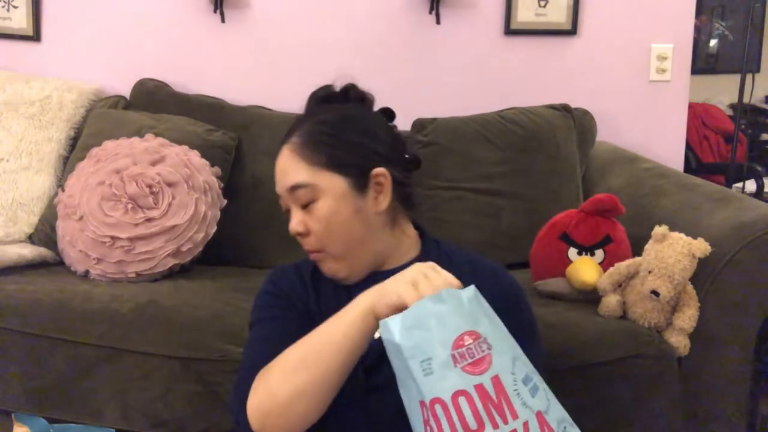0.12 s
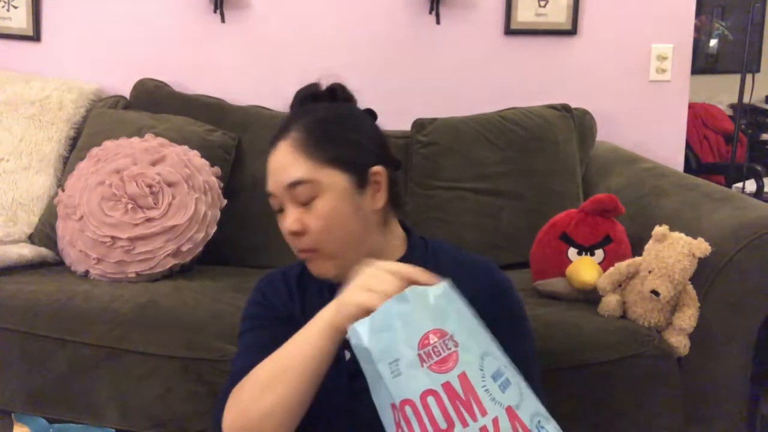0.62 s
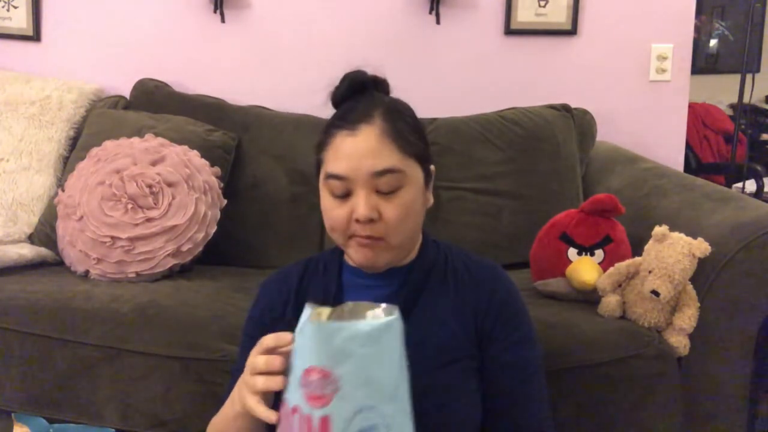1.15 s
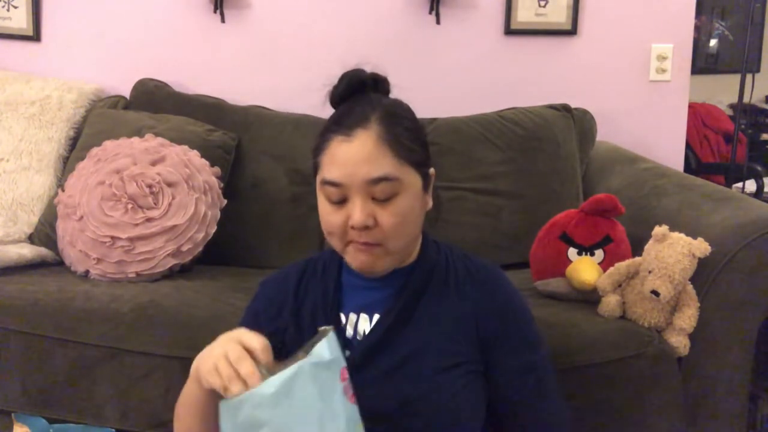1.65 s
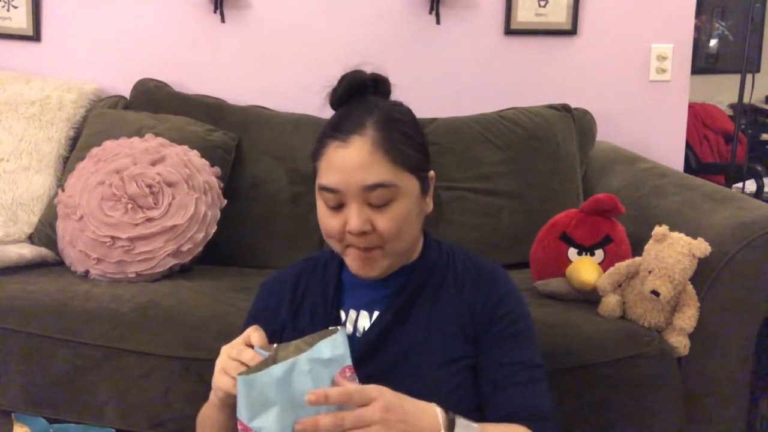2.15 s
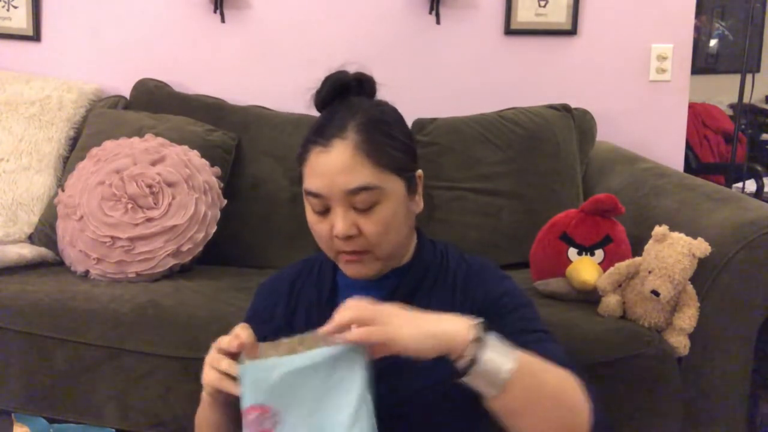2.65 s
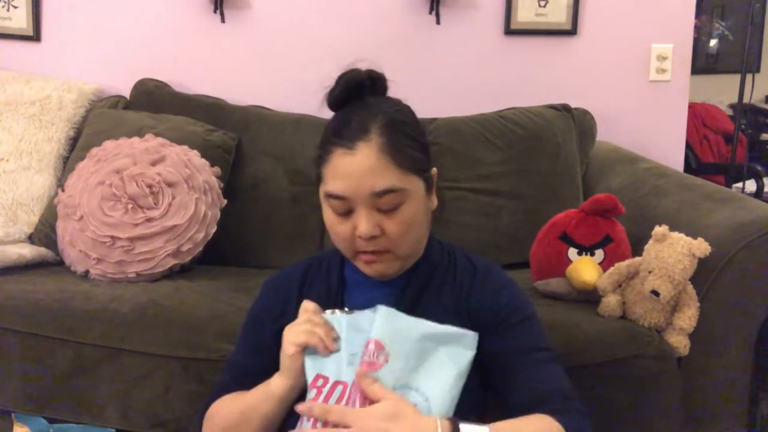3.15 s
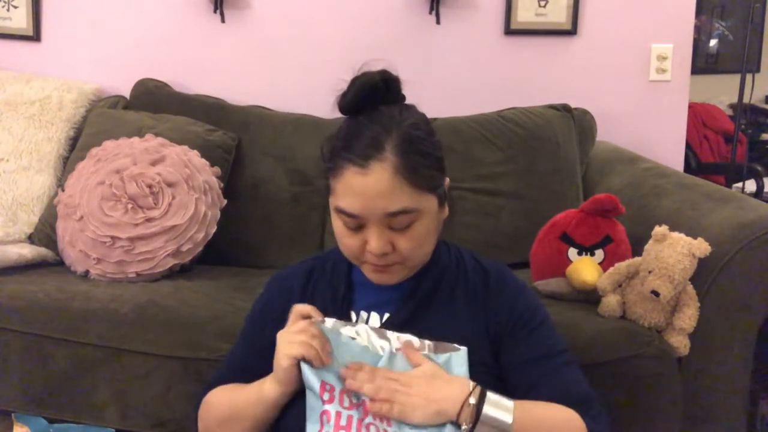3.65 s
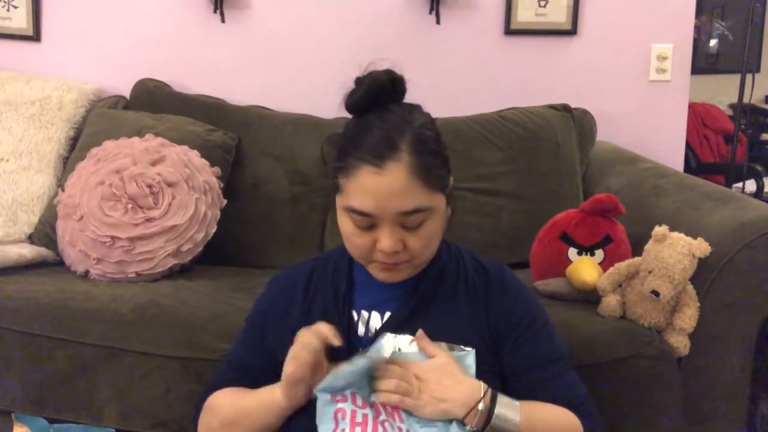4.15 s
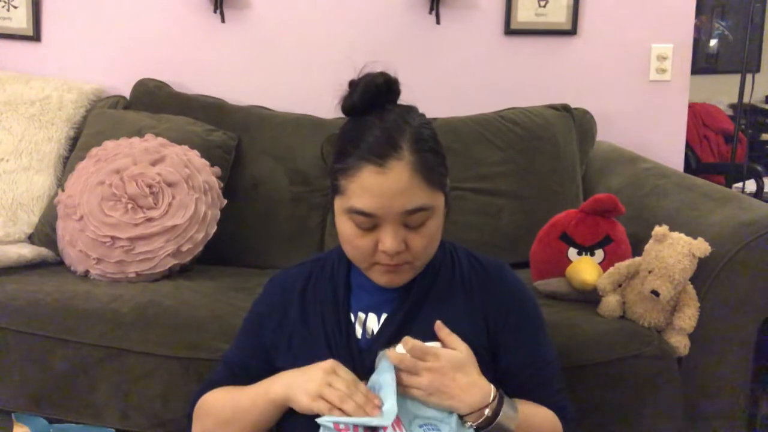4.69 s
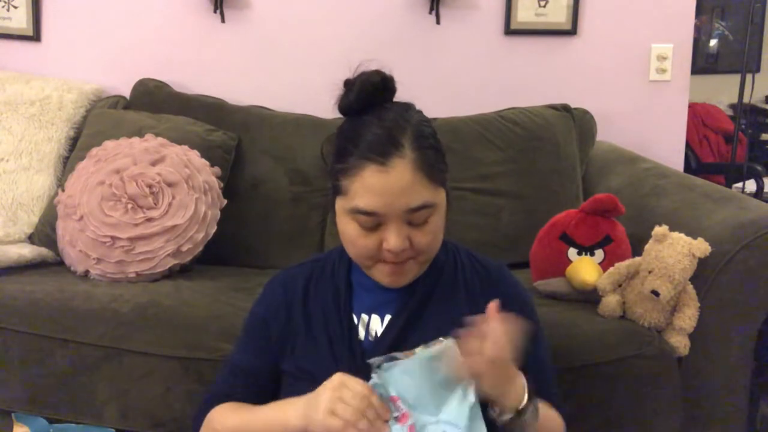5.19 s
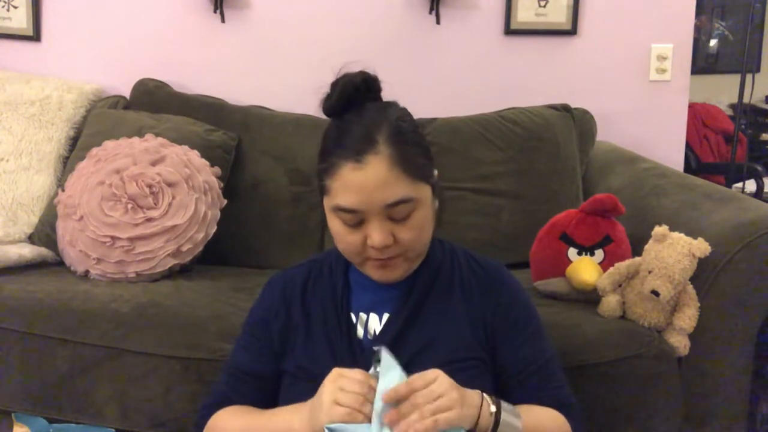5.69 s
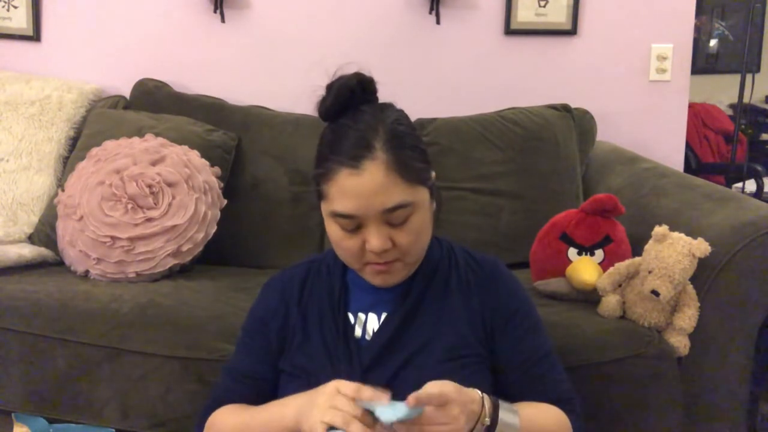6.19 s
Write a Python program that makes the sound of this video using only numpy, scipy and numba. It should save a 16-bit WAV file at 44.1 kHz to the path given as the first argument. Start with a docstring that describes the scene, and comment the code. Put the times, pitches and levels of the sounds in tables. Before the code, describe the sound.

In a soft-furnished living room, a phone microphone about a metre away picks up a foil-lined snack bag. Fingers brush faintly inside, then dull, scattered rustles and ticks follow. From about three seconds the crinkling becomes dense, sharp and bright while the bag is flattened and folded, staying busy to the end over very faint room hum.

```python
"""A foil-lined snack bag is handled and folded in a soft living room, a metre from a phone's microphone.
A faint room hum lies under all. In the first half second fingers brush the lining as they reach in.
Pushes of the hands stir a dense rustle of tiny creases, and sharp snaps of buckling film stand over it:
sparse at first, thick and bright from about 3 s. The air in the bag booms near 2.8 s and again at the end.
Floor, sofa and walls answer briefly throughout; film, lining and air ring as modes or resonant bands."""
import sys
import numpy as np
from scipy import signal
from scipy.fft import rfft, irfft
from scipy.io import wavfile
from numba import njit

SR = 44100
rng = np.random.default_rng(int(sys.argv[2]) if len(sys.argv) > 2 else 0)


def makeup_ratio(level_db):
    """Linear amplitude ratio for a level in decibels (20 dB per factor of ten)."""
    decades = np.asarray(level_db, float) / 20
    return 10 ** decades


def master(y):
    """Save y as 16-bit WAV."""
    cut = np.clip(np.atleast_2d(y).T, -1, 1)
    pcm = np.round(cut * 32767)  # scale
    wavfile.write(sys.argv[1], SR, pcm.astype(np.int16))


N = 278435  # samples, 6.3 s


def unit(x):
    """Scale to rms 1."""
    return x / np.sqrt(np.mean(x ** 2))


# Spectrum of the quiet room at the microphone: f/Hz, relative level/dB
HUM_SPECTRUM = [(24, -30), (40, -6), (118, -3), (220, -8), (1100, -24), (2000, -31), (3700, -29),
                (10700, -31), (16000, -34)]


def hum():
    """Distant air handling rumble and microphone hiss: steady noise shaped over frequency."""
    hum_rms_db = -68
    hz, db = np.transpose(HUM_SPECTRUM)
    f = np.maximum(np.arange(N // 2 + 1) * SR / N, 1)
    spectrum = rfft(rng.standard_normal(N)) * makeup_ratio(np.interp(np.log(f), np.log(hz), db))
    return makeup_ratio(hum_rms_db) * unit(irfft(spectrum, N))


# First reflections, off the floor and then the sofa: delay t/s, level/dB before the dulling
EARLY_ECHOES = [(.0045, -37), (.011, -21.5)]


def room(x, block=4096):
    """Two early echoes and a short dull noise tail, drawn anew per block as the bag moves about."""
    tail_db, tail_t60_s, tail_onset_s = -8.5, 0.2, 0.0078
    t = np.arange(SR // 3) / SR
    shape = makeup_ratio(-60 * t / tail_t60_s) * (1 - np.exp(-(t / tail_onset_s) ** 2))
    shape = shape / np.sqrt(np.sum(shape ** 2))
    reflected = np.zeros(N + block + len(t))
    for i in range(0, N, block):
        answer = makeup_ratio(tail_db) * rng.standard_normal(len(t)) * shape
        for s, db in EARLY_ECHOES:
            answer[int(s * SR)] += makeup_ratio(db)
        wet = signal.fftconvolve(x[i:i + block], answer)
        reflected[i:i + len(wet)] += wet
    soft_walls = signal.butter(1, 6000., fs=SR, output="sos")
    return x + signal.sosfilt(soft_walls, reflected[:N])


# Air left in the bag as it is grabbed and squeezed: t/s, level/dB of its ringing
AIR_IN_BAG = [(0, -17), (2.4, -5), (2.6, -6.5), (2.8, 0.5), (3.1, -37), (5.5, -13), (6.31, 4)]


def hollow(x):
    """The air inside the open bag rings along as one broad resonance of varying strength."""
    air_hz, air_width_hz = 1077, 370
    s, db = np.transpose(AIR_IN_BAG)
    air = signal.lfilter(*signal.iirpeak(air_hz, air_hz / air_width_hz, fs=SR), x)
    return x + makeup_ratio(np.interp(np.arange(N) / SR, s, db)) * air


# Fingers brushing the lining while reaching in: t/s, rms level/dB at the bag
BRUSH_LEVEL = [(0, -80), (.05, -74), (.09, -74.5), (.122, -61), (.15, -70), (.21, -68), (.25, -66),
               (.29, -73), (.4, -73), (.47, -86)]
# Soft bands in which the lining rings: f/Hz, width f/Hz, relative level/dB
LINING_BANDS = [(2700, 380, 1), (3360, 400, -4), (4800, 450, -6)]


def brush():
    """A fine, patchy scrape that rings three soft bands of the lining."""
    s, db = np.transpose(BRUSH_LEVEL)
    patch = 200  # samples of even strength
    patch_db = np.repeat(4.1 * rng.standard_normal(N // patch + 1), patch)[:N]
    scrape = rng.standard_normal(N) * makeup_ratio(patch_db)
    bands = np.zeros(N)
    for hz, width_hz, band_db in LINING_BANDS:
        bands += makeup_ratio(band_db) * signal.lfilter(*signal.iirpeak(hz, hz / width_hz, fs=SR), scrape)
    return unit(bands) * makeup_ratio(np.interp(np.arange(N) / SR, s, db, right=-200))


@njit
def ring(start, hz, cycles, rise, size, n):
    """Each row is a struck mode that swells over its rise (samples) and fades by 60 dB in its cycles."""
    out = np.zeros(n)
    for e in range(len(start)):
        turn = np.exp((2j * np.pi - np.log(1000) / cycles[e]) * hz[e] / SR)
        z, held, q = size[e] + 0j, 1., np.exp(-1 / rise[e])
        for i in range(start[e], min(n, start[e] + int(cycles[e] * SR / hz[e]))):
            z *= turn
            held *= q
            out[i] += z.imag * (1 - held)
    return out


# Pitches at which the low, middle and top levels of a crease hold: f/Hz
LEVEL_PITCHES = [700, 3870, 12000]


def colours(db, brightness_db, bend_db):
    """Middle, low and top levels of a crease: tilted and bent over the octaves, the strongest at db."""
    octaves = np.log2(np.divide(LEVEL_PITCHES, LEVEL_PITCHES[1]))[[1, 0, 2], None]
    shape = brightness_db * octaves - bend_db * octaves ** 2
    return db + shape - shape.max(axis=0)


# Modes of a buckling panel of film: mean f/Hz, relative level/dB, typical cycles to fade by 60 dB
FILM_MODES = [(213, -9.5, 8.9), (350, -4.5, 8.03), (487, -2.5, 9), (630, -1.5, 10.9), (930, 1, 9.3),
              (1190, 9, 7.2), (1722, 3.5, 13.1), (2063, 0, 19.2), (2640, 6, 13.1), (3400, 5, 19.5),
              (4180, 6, 13.6), (5020, 5.5, 14.9), (6150, 15, 7), (7590, 6, 20.5), (9530, -21.5, 8.4),
              (11020, 3.5, 21.3), (13940, 5.5, 11), (13700, -4, 11)]


def buckle(s, middle_db, low_db, top_db, scatter_db, spread_s, detune=0.13):
    """Every crease rings the film's modes with its own tuning, signs and strengths; low modes set in later."""
    hz, db, cycles = np.transpose(FILM_MODES)
    chance = rng.standard_normal((len(s), 4, len(hz))).transpose(1, 0, 2)
    # each mode takes its level from the pitches on either side of it
    place = np.interp(np.log(hz), np.log(LEVEL_PITCHES), np.arange(3))
    share = np.clip(1 - abs(place - np.arange(3)[:, None]), 0, 1)
    colour_db = np.transpose([low_db, middle_db, top_db]) @ share + db
    start_s = s[:, None] + spread_s * abs(chance[0]) + 0.22 / hz
    tuned_hz = np.minimum(hz * np.exp(detune * chance[1]), .45 * SR)
    size = makeup_ratio(colour_db + scatter_db * chance[2]) * np.sign(chance[3])
    length = cycles * np.exp(0.12 * chance[3])
    rise = .6 * SR / tuned_hz  # the film needs part of a cycle to get going
    start = (start_s * SR).astype(np.int64)
    return ring(start.ravel(), tuned_hz.ravel(), length.ravel(), rise.ravel(), size.ravel(), N)


# Pushes of the hands that set the film rustling: t/s of most force, relative level/dB,
# swell t/s, fade t/s, brightness/dB per octave
HAND_PUSHES = [(.06, -62.5, 0.16, 0.13, -4), (.254, -56.5, 0.18, 0.31, -5), (.56, -50.5, 0.031, 0.22, -5.5),
               (0.68, -55.5, 0.11, 0.012, -4.5), (.773, -55.5, .06, 0.033, -2.5),
               (1.018, -62, 0.27, 0.71, -4), (1.307, -61, 0.17, 0.066, -3), (1.4, -52.5, 0.019, 0.15, -4),
               (1.548, -41, 0.097, 0.076, -2.5), (1.699, -45.5, 0.061, 0.057, -4),
               (1.76, -54, .1, 0.22, -1.5), (2.05, -49, 0.12, 0.089, -7.5), (2.165, -57, 0.072, 0.026, -2),
               (2.3, -55.5, 0.14, 0.19, -2.5), (2.513, -53, 0.0082, 0.45, -3),
               (2.668, -38, 0.063, 0.19, -2), (2.79, -45, .2, 0.033, -3.5),
               (2.942, -42.5, 0.11, 0.11, -3.5), (3.147, -46.5, 0.091, 0.34, -6),
               (3.362, -44.5, 0.34, 0.54, -3), (3.609, -39.5, 0.32, 0.12, 0),
               (3.896, -44, 0.11, 0.18, -1.5), (4.081, -46.5, 0.16, 0.054, -1),
               (4.215, -43.5, 0.16, 0.088, -1), (4.282, -40, 0.069, 0.18, 0), (4.468, -37, .04, 0.024, -4),
               (4.545, -47, 0.12, 0.26, -2.5), (4.72, -50.5, .3, 0.24, -3), (4.96, -49.5, 0.11, 0.35, -1),
               (5.03, -48, 0.18, 0.36, -1), (5.24, -61, 0.24, 0.21, -10.5), (5.408, -40, 0.0088, 0.3, -1),
               (5.531, -36.5, 0.1, 0.17, -0.5), (5.743, -35.5, 0.058, 0.11, 0.5),
               (5.89, -45, 0.051, 0.21, -0.5), (6.131, -47, 0.073, 0.19, -2), (6.3, -46, .1, .1, 0.5)]


def handling(s):
    """Levels of the rustle at times s: every push swells and fades, and their powers add."""
    swell_db = 20  # gained over the swell time, lost over the fade time
    at, db, swell, fade, brightness_db = np.transpose(HAND_PUSHES)
    late = s[:, None] - at
    force_db = -swell_db * np.where(late < 0, -late / swell.clip(.005), late / fade.clip(.005))
    push_db = colours(db, brightness_db, bend_db=.5)  # bend per octave squared
    power = makeup_ratio(force_db) ** 2 @ makeup_ratio(push_db).T ** 2
    return 10 * np.log10(power.T + 1e-12)


def rustle(count=1300, size=5):
    """Small creases set each other off in short runs, mostly faint; wide panels sound low, narrow ones high."""
    run = rng.random((count, 2)).T
    crease = rng.random((count, 2, size)).transpose(1, 0, 2)
    colour_db = 4.85 * np.repeat(rng.standard_normal((count, 3)), size, axis=0).T  # one colour a run
    first_s = (np.arange(count) + 4 * run[0] - 2).clip(0) * N / SR / count
    s = (first_s[:, None] - .005 * np.log(1 - crease[0])).ravel()
    size_db = (-3.0 * np.log(1 - run[1, :, None]) - 4.5 * np.log(1 - crease[1])).ravel()
    size_db = 15.7 * np.tanh(size_db / 14.35)  # holds back the largest
    levels = handling(s)
    # light handling (-67 dB) gives more even creases than firm handling (-50.5 dB)
    uneven = np.interp(levels.max(axis=0), [-67, -50.5], [0.66, 1])
    middle_db, low_db, top_db = levels + uneven * (size_db + colour_db)
    return makeup_ratio(-13.0) * buckle(s, middle_db, low_db, top_db, scatter_db=4.5, spread_s=.0008)


# Loud crease snaps, wide panels dull and narrow ones bright: t/s, relative level/dB, brightness/dB per octave
CREASE_SNAPS = [(0.1205, -53, -0.7), (0.2377, -57, 7), (0.2452, -50, -2.5), (0.3243, -53, -7),
                (0.378, -50.5, -5.5), (0.425, -54, -2.4), (0.554, -57, -4), (0.5651, -35, -10.5),
                (0.6052, -37, -10.5), (0.6298, -40, 12), (0.6722, -43, -15), (0.7711, -50.0, -2),
                (0.7784, -45, -12), (0.9456, -41, -11), (1.0017, -50, -20), (1.0129, -42, -7),
                (1.3346, -50, -9.5), (1.3931, -40.5, -3.5), (1.413, -37.5, -7), (1.4409, -39.0, -4),
                (1.4615, -42, -5.3), (1.4853, -35.5, -2.6), (1.5018, -38, -2), (1.5162, -42, -5),
                (1.535, -32, 0), (1.68, -45.0, -6.5), (1.6967, -37, -8.5), (1.7232, -26, 1.5),
                (1.805, -44, -11), (1.8585, -45.5, -5.5), (1.951, -53, -7.5), (1.9848, -56, -4),
                (2.051, -31.5, -1), (2.1132, -41, -6.5), (2.1426, -49, -7.8), (2.1584, -45, -12),
                (2.171, -40, -5), (2.2204, -38, -11.5), (2.2938, -40, -9), (2.3024, -34, -20),
                (2.5028, -50, -7), (2.5189, -44, -8.2), (2.5303, -44, -9), (2.5606, -33, -0.5),
                (2.5913, -33.5, -4), (2.601, -35, -5), (2.6218, -41, -9), (2.6375, -29.5, -3.5),
                (2.7928, -34, -0.5), (2.8842, -34, -0.5), (2.9057, -31, 2), (2.9129, -35, -5.5),
                (2.9409, -36, -2.5), (2.9869, -43.5, -6), (3.0337, -33, -1.5), (3.0749, -35.5, -5.5),
                (3.0963, -45, -8), (3.1341, -37, -6.5), (3.1694, -38.5, -4.5), (3.2339, -33.5, 3),
                (3.2562, -26.0, -0.2), (3.3333, -41.5, 0), (3.3525, -28, 2.5), (3.3709, -30.0, 0.5),
                (3.3826, -28, 2), (3.392, -25.5, 4.5), (3.415, -30, -6), (3.492, -33, -0.5),
                (3.5227, -27.5, 2), (3.595, -24.5, 4.3), (3.653, -28, 1.7), (3.7559, -42, -3),
                (3.7646, -50, -12), (3.819, -37, -0.5), (3.8628, -33, 3), (3.8823, -28.0, 1.0),
                (3.8907, -29.5, 0), (3.9052, -27.5, 0.5), (3.9967, -31, 1), (4.0625, -34, 0),
                (4.0818, -29.5, 2), (4.0969, -30, 3), (4.1481, -26, 6), (4.1601, -29.5, 3),
                (4.1722, -33, 0.5), (4.1934, -28.5, -2), (4.2087, -25, -0.6), (4.277, -37, 11),
                (4.3063, -24.5, 3.5), (4.3406, -27, 8), (4.3845, -33.5, -3.2), (4.4076, -34.5, 2.4),
                (4.4578, -28, -0.5), (4.466, -25.5, -1.9), (4.531, -28.5, 3), (4.555, -32, -1),
                (4.6457, -34, 0), (4.6659, -40.5, 4.5), (4.6952, -39.0, 3), (4.7117, -35, 0),
                (4.7345, -33.5, 3), (4.7842, -39, -6.5), (4.8224, -47.5, -3.5), (4.8518, -46, -6),
                (4.895, -43, 2), (4.9194, -35.5, -7.5), (4.9427, -22.5, 1.7), (4.988, -33, 2),
                (4.9998, -26.5, -3.8), (5.0245, -24, 10.5), (5.0424, -20, 11), (5.0884, -35, 1.5),
                (5.1234, -36.5, -4), (5.1564, -33, 2), (5.1745, -35, -1), (5.2221, -37.5, -4.5),
                (5.2418, -36.5, -5.3), (5.3101, -35.5, 0.4), (5.4023, -39.5, -5.5), (5.4076, -34, -1.5),
                (5.448, -25.5, 13), (5.4991, -18.5, 6), (5.5353, -29, 2.5), (5.5466, -25, 9),
                (5.5707, -28, 2), (5.6024, -33, -2), (5.6104, -23.0, 1.4), (5.6584, -28, 2.3),
                (5.71, -38, -3), (5.727, -33, 4), (5.7476, -24, 0), (5.7823, -26.5, 0.1),
                (5.8217, -29.5, 2), (5.8547, -40, 0.5), (5.8674, -32, 0.5), (5.8742, -33, 0),
                (5.8826, -35, 1.5), (5.899, -32.5, -1.2), (5.922, -22.5, 4), (5.9592, -33, -4.5),
                (6.0173, -33, -0.8), (6.0295, -34, 3.5), (6.0544, -33, -5), (6.0632, -35.5, -2.5),
                (6.118, -40, -5), (6.147, -41, -3.5), (6.1988, -33.5, 1.5), (6.2056, -36, -2),
                (6.217, -31.5, 6), (6.2415, -33.0, 4), (6.262, -32.5, -2.0), (6.2714, -21.5, 6.7),
                (6.2896, -30, 2.5), (6.2995, -30, 4)]
# One crease gives way in steps around its main break: typical t/s, typical relative level/dB
CREASE_STEPS = [(-.0035, -16.5), (-.0012, -9.5), (0, 4.5), (.0009, -7.5), (.0024, -16)]


def snaps():
    """The big creases: a faint start, the main break and a few after-breaks within a few milliseconds."""
    s, db, brightness_db = np.transpose(CREASE_SNAPS)
    levels = colours(db, brightness_db, bend_db=1.6)  # bend per octave squared
    late, step_db = np.transpose(CREASE_STEPS)
    chance = rng.standard_normal((len(s), 2, len(late))).transpose(1, 0, 2)
    s = s[:, None] + late * np.exp(0.39 * chance[0])
    step_db = step_db + 5.5 * chance[1] * (step_db < 0)  # the main break keeps its level
    middle_db, low_db, top_db = ((level[:, None] + step_db).ravel() for level in levels)
    return makeup_ratio(-4.5) * buckle(s.ravel(), middle_db, low_db, top_db, scatter_db=2.5, spread_s=.0003)


def scene():
    """Thin film radiates no deep bass; the hum fills it."""
    film_bass_cut = signal.butter(4, 90, "high", fs=SR, output="sos")  # Hz
    bag = signal.sosfilt(film_bass_cut, snaps() + rustle() + brush())
    return (room(hollow(bag)) + hum())[None]


def band_limit(x):
    """A steep low-pass at the top of the band."""
    return signal.sosfilt(signal.butter(12, 16990, fs=SR, output="sos"), x)


def record(dry):
    """The phone's microphone, a metre away, cuts the deep bass and the top."""
    bass_cut = signal.butter(4, 51, "high", fs=SR, output="sos")  # Hz
    top_cut = signal.ellip(8, .2, 60, 15800, fs=SR, output="sos")  # ripple dB, stop dB, Hz
    mix = signal.sosfilt(top_cut, signal.sosfilt(bass_cut, dry))
    return band_limit(mix)


dry = scene()
out = record(dry)
master(out)
```